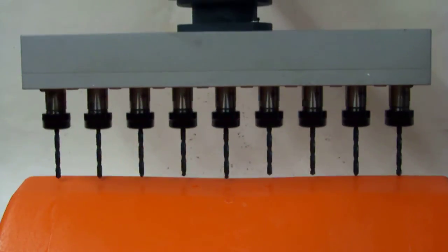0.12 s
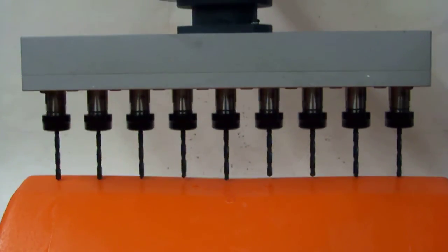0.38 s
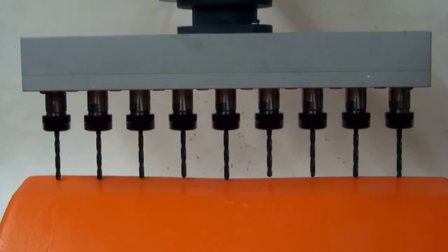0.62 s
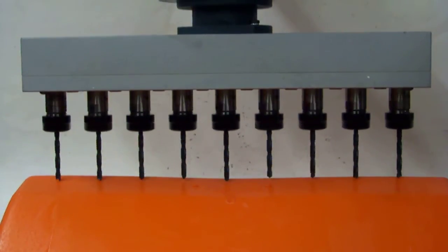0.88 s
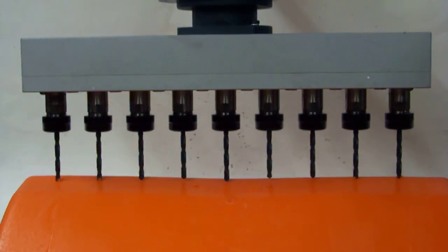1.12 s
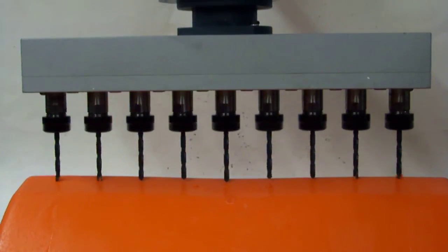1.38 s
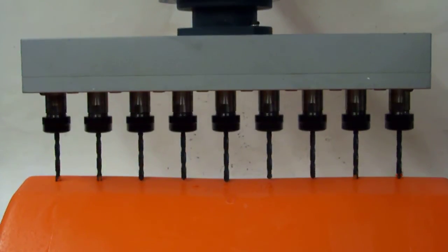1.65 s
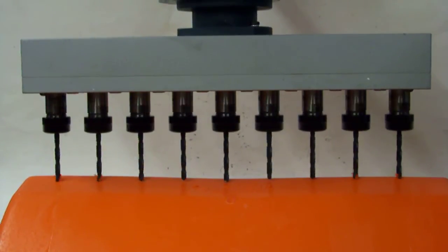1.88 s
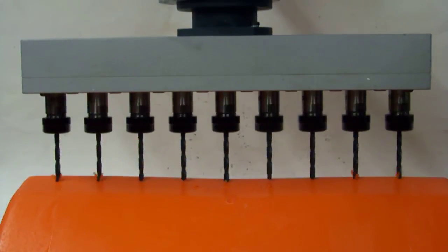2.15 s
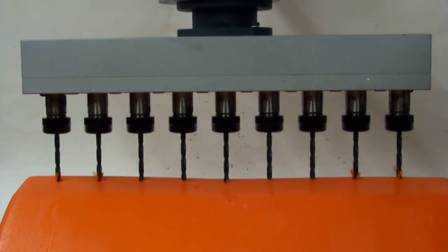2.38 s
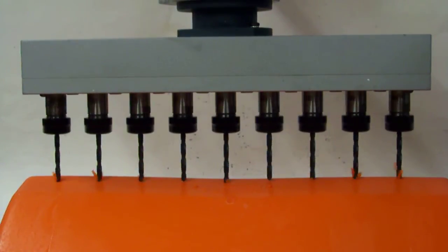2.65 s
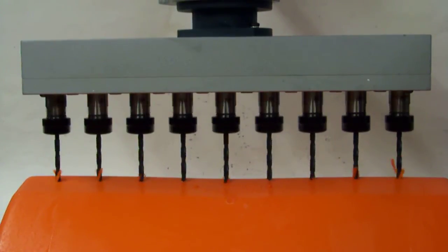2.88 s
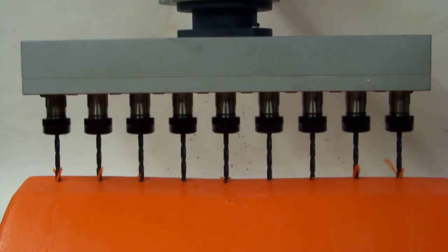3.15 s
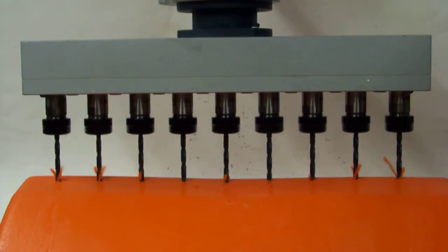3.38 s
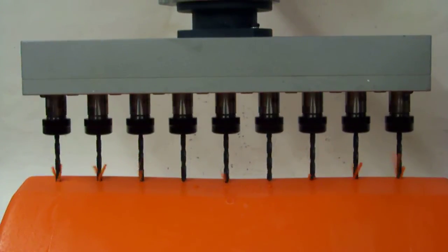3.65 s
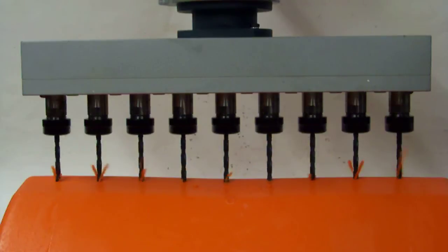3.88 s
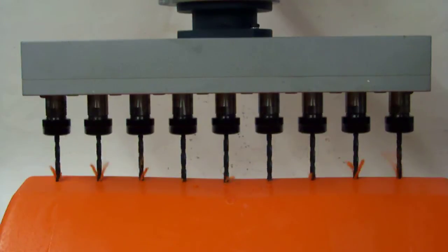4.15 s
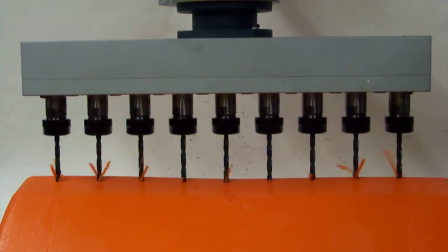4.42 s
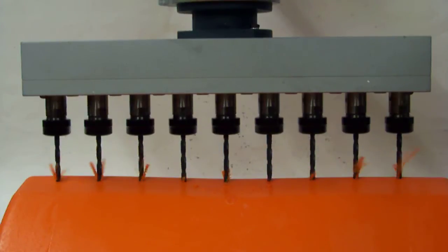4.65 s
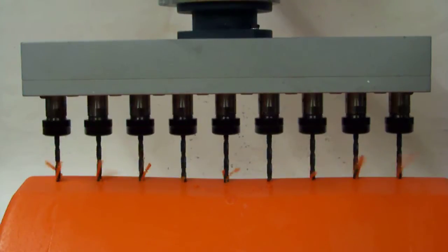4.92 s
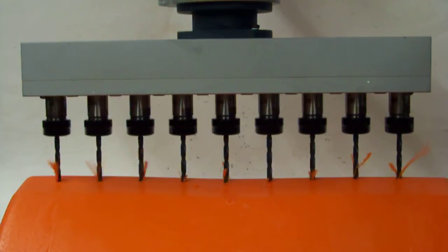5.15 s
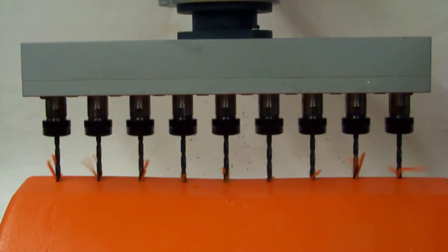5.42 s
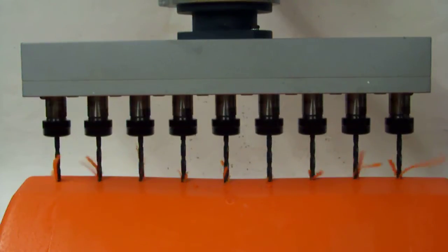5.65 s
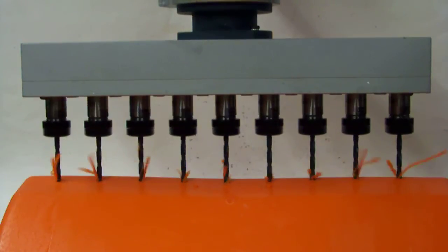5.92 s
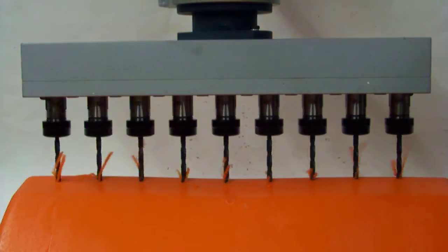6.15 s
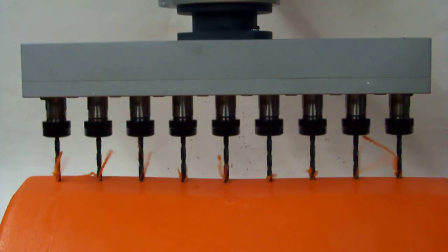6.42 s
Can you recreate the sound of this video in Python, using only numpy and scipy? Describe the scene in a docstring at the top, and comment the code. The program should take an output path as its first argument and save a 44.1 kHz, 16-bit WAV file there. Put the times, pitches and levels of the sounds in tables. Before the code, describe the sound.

Hollow plastic clatter at the start over a humming drilling machine, then a piercing, slightly stuttering gear whine grows as many bits scrape and crackle into plastic.

```python
"""A motor's hum and whirring gears come first, joined at once by hollow knocks as bits land on a plastic shell.
A nine-spindle drilling head is lowered in a workshop: as it bites, the gear whine and cutting noise swell.
Hum and gears are wavering sines, knocks are ringing modes, and scraping, chips and idling are shaped noise.
The recorder's clock lags and catches up in small skips thirty times a second, so every tone stutters in step."""
import sys
import numpy as np
from scipy import signal
from scipy.fft import rfft, irfft
from scipy.io import wavfile

SR = 44100
rng = np.random.default_rng(int(sys.argv[2]) if len(sys.argv) > 2 else 0)


def voltage_ratio(decibels):
    """Convert decibels (scalar or array-like) to amplitude ratios, 20 dB per decade."""
    exponent = np.asarray(decibels, float) / 20
    return 10 ** exponent


def file_out(sig):
    """Save sig as 16-bit WAV at sys.argv[1]."""
    # one column per channel
    cols = np.atleast_2d(sig).T
    # limit, then scale
    lim = np.clip(cols, -1, 1)
    pcm = np.round(lim * 32767).astype(np.int16)
    wavfile.write(sys.argv[1], SR, pcm)


N = 288414   # length in samples
F = np.fft.rfftfreq(N, 1 / SR) + 1   # Hz; the added 1 avoids the log of zero
LEFT_LAG_RAD = .16   # the left side lags the right by this phase
BITE_S = .7   # the bits start to bite
SKIPS_PER_S, FIRST_SKIP_S = 30, .0355


def at_hz(points):
    """Joins a table of (Hz, value) on a log-frequency axis."""
    hz, value = np.array(points).T
    return np.interp(np.log(F), np.log(hz), value)


def bumps_db(rows):
    """Sum of bell-shaped peaks or dips in dB."""
    return sum(db / (1 + (2 * (F - hz) / width) ** 2) for hz, width, db in rows)


def drift(rate_hz):
    """Random wandering of spread 1: noise smoothed twice, with its corner at rate_hz."""
    r = np.exp(-80 * np.pi * rate_hz / SR)   # made at one value per 40 samples
    wander = signal.lfilter([1], [1, -2 * r, r * r], rng.standard_normal(N // 40 + 2002))
    wander = wander[2000:]   # skip the filter's start-up
    return np.interp(np.arange(N) / 40, np.arange(len(wander)), wander / wander.std())


def growth_db(delay_s, growth_s, idle_db, full_db):
    """A level that rests until its delay after the bite, then closes in on its full value."""
    since = np.maximum(np.arange(N) / SR - BITE_S - delay_s, 0)
    return full_db + (idle_db - full_db) * np.exp(-since / growth_s)


def pan(left_right_db):
    """Left and right gains whose mean is 1."""
    right = voltage_ratio(-left_right_db)
    gains = np.array([np.ones_like(right), right]).reshape(2, -1)
    return 2 * gains / (1 + right)


# How alike the two sides of the noise are. Each row: frequency in Hz, likeness from 0 to 1.
LIKENESS = [(60, 1), (600, 1), (900, 0.82), (1300, .7), (2000, 0.92), (2700, 0.15), (4000, 0.24),
            (8000, 0.16)]
# How much louder the noise is on the left. Each row: frequency in Hz, left over right in dB.
LEFT_OVER_RIGHT = [(60, 7.5), (100, 13), (180, 11), (310, 11.5), (530, 6.5), (910, 7.5), (1580, 11),
                   (2720, 13), (4690, 5), (8090, 0.5)]


def stereo_noise(gain):
    """Noise of a given spectrum; the right side shares only part of it. The mid has rms 1."""
    shared, own = rfft(rng.standard_normal((2, N)))
    alike = np.clip(at_hz(LIKENESS), 0, 1)
    right = alike * shared + np.sqrt(1 - alike ** 2) * own
    right = right * np.exp(1j * LEFT_LAG_RAD)
    out = irfft(gain * pan(at_hz(LEFT_OVER_RIGHT)) * [shared, right], N)
    return out / out.mean(axis=0).std()


def skip_times():
    """Start of each regular clock skip, in seconds."""
    return np.arange(FIRST_SKIP_S, N / SR, 1 / SKIPS_PER_S)


# The largest clock skips, heard as hiccups of the whine. Each row: time in seconds, size in samples.
LARGE_SKIPS = [(.109, 5), (.199, 5), (.242, 4.5), (.438, 4.5), (.576, 5.5), (.804, 6.5), (1.203, 5.5),
               (1.3067, 7), (2.371, 4), (3.302, 7.9), (3.468, 4.5), (3.904, 4.5), (4.3, 12), (4.8015, 8),
               (5.302, 8.5), (6.133, 4.5)]


def recorder_clock():
    """Seconds as the recorder keeps them: a steady lag made up by regular skips of random size."""
    times, t = skip_times(), np.arange(N) / SR
    skips = np.zeros(N)
    # average size 1.6 samples before the largest draws are capped
    skips[(times * SR).astype(int)] = 1.6 * rng.exponential(1, len(times)).clip(0, 2.2)
    for s, samples in LARGE_SKIPS:
        at = round(s * SR)
        skips[at - 400:at + 400] = 0   # a large skip replaces its close neighbours
        skips[at] = samples
    blend = np.hanning(int(.0065 * SR))   # each skip is spread over 6.5 ms
    gained = np.cumsum(signal.fftconvolve(skips, blend / blend.sum(), "same"))
    return t + (gained - gained[-1] * t / t[-1]) / SR


def tone(hz, db, pan_db, clock, waver_db, rate_hz):
    """A sine of given rms level whose strength wavers."""
    turn = 2 * np.pi * (hz * clock + rng.random()) + np.array([[0], [LEFT_LAG_RAD]])
    strength = np.sqrt(2) * voltage_ratio(db + waver_db * drift(rate_hz))
    return strength * pan(pan_db) * np.sin(turn)


# How the whine swells: delay after the bite and growth time in seconds, idle and full level in dB.
WHINE_GROWTH = (0, 1.54, -28, -21)
# How the other gear tones swell: delay after the bite and growth time in seconds, idle and full level in dB.
GEAR_GROWTH = (-.4, .15, -32.5, -30.8)
# Gear mesh, its side tones from spindle turn and hum, and faint upper meshes. Each entry: pitch in Hz.
GEAR_HZ = [636.6, 656.7, 677, 700.5, 756.4, 776.6, 1433.3, 1866.7, 2277, 2451, 2491, 2560, 2746.8, 3009,
           3162.7, 3523]
# Loudness of those pitches, in the same order. Each row: dB relative to the gear level, left over right in dB.
GEAR_LOUDNESS = [(-19.5, 6), (-1, 9.5), (-23, 11.5), (-19, 4), (-21.5, 5), (-15, 10.5), (-18.5, 14),
                 (-21, 7.5), (-31, 8), (-29.5, 8.5), (-30, 9.5), (-31, 7), (-20, 4.5), (-28, 10.5),
                 (-28, 9.5), (-30, 6.5)]
# Neighbours of the whine on the fast shaft. Each row: multiple of the shaft speed, rms in dB,
# left over right in dB.
SHAFT_TONES = [(13, -55.5, 9), (15, -47, 9.2), (16, -40.5, 10.5), (18, -51, 7), (19, -60, 9.3)]
# Slower shafts, slightly off centre, make the whine throb. Each row: turns per second, swing in dB.
RUNOUT = [(11.2, 0.4), (20.2, 0.32), (23.9, 0.67)]


def gears():
    """Meshing teeth sing at pitches tied to one shaft angle, which slows a little as the load grows."""
    shaft_hz, teeth = 107.45, 17
    sag = .0006   # share of speed lost between idle and full load
    clock = recorder_clock_now
    whine_db, gear_db = growth_db(*WHINE_GROWTH), growth_db(*GEAR_GROWTH)
    load = np.interp(whine_db, [whine_db.min(), whine_db.max()], [0, 1])
    angle = clock - np.cumsum(sag * (load - load.mean())) / SR

    # weaker mesh tones waver more
    mesh = sum(tone(hz, gear_db + db, pan_db, angle, waver_db=0.5 - 0.1 * db, rate_hz=10.0)
               for hz, (db, pan_db) in zip(GEAR_HZ, GEAR_LOUDNESS))
    neighbours = sum(tone(k * shaft_hz, db, pan_db, angle, waver_db=1.5, rate_hz=9.1)
                     for k, db, pan_db in SHAFT_TONES)
    throb_db = sum(db * np.sin(2 * np.pi * (turns * angle + rng.random())) for turns, db in RUNOUT)
    whine = tone(teeth * shaft_hz, whine_db + throb_db, 10.0, angle, waver_db=0.05, rate_hz=17.0)
    return mesh + neighbours + whine


# How the hum swells: delay after the bite and growth time in seconds (it starts early), idle and full level in dB.
HUM_GROWTH = (-.35, .55, -36, -31.6)
# Magnetic hum. Each row: multiple of twice the mains, dB relative to the hum level, left over right in dB.
HUM = [(1, -23.5, 28), (2, -20, 8.9), (3, -0.5, 11.7), (4, -22, 10), (6, -11, 6.7), (7, -25.5, 12)]


def motor():
    """Magnetic hum locked to the mains, at multiples of twice its frequency."""
    mains_twice_hz = 120.12
    hum_db = growth_db(*HUM_GROWTH)
    return sum(tone(k * mains_twice_hz, hum_db + db, pan_db, recorder_clock_now, waver_db=0.68, rate_hz=14.0)
               for k, db, pan_db in HUM)


# Bits landing on the shell and chattering. Each row: time in seconds, level in dB, brightness in dB per octave.
KNOCKS = [(0.1297, -12.5, 3), (.1387, -14.5, .5), (0.155, -15, -5), (.166, -19.5, 0), (0.1751, -20, 2.5),
          (0.1895, -18.5, -6), (.203, -27, 1), (.222, -27, 1), (.24, -27, -0.7), (.256, -26, -4.5),
          (.283, -26.5, -6), (0.575, -26.5, -8)]
# Ringing modes of the shell. Each row: pitch in Hz, level in dB, seconds to fade by 60 dB.
SHELL_MODES = [(165, -23.5, 0.28), (212.6, -12, 0.24), (244, -7, 0.21), (343, -16, 0.061), (423, -9, 0.077),
               (467, -5.5, 0.049), (537.5, -5.5, .1), (628, -5, 0.07), (706, -5.5, 0.097), (795, -8, 0.06),
               (850, -10, .09), (924, -19, 0.035), (1078, -16.5, 0.07), (1290, -16.5, .04),
               (1630, -19.5, .03), (2700, -25, .02), (3100, -25, .02), (3900, -26, .02), (4500, -28, .015)]


def shell():
    """Each knock pushes the shell's modes with strengths of its own; harder contacts favour the high ones."""
    contact_s = .0005   # the plastic gives before it pushes back
    out, age = np.zeros(N), np.arange(int(.5 * SR)) / SR
    chance_db = rng.normal(0, 1.5, (len(KNOCKS), len(SHELL_MODES)))
    for (s, db, tilt_db), own_db in zip(KNOCKS, chance_db):
        rings = 0
        for (hz, mode_db, t60), extra_db in zip(SHELL_MODES, own_db):
            level_db = mode_db + extra_db + tilt_db * np.log2(hz / 400) - 60 * age / t60
            rings = rings + voltage_ratio(level_db) * np.sin(2 * np.pi * hz * age)
        out[round(s * SR):][:len(age)] -= voltage_ratio(db) * rings * (1 - np.exp(-age / contact_s))
    # a light shell radiates no deep bass
    out = signal.sosfilt(signal.butter(4, 165, "high", fs=SR, output="sos"), out)
    return out * pan(10.5)


# How the scraping swells once the flutes are in: delay after the bite and growth time in seconds,
# idle and full level in dB.
SCRAPING_GROWTH = (1.0, 1.0, -44.5, -35.3)
# Resonances of the shell under the bits. Each row: centre in Hz, width in Hz, height in dB.
CUTTING_PEAKS = [(1039, 280, -3), (1144, 55, -1.5), (1223.6, 35, 5), (1480, 420, -5.5), (765, 260, -9.5)]
# Cancellations by bench reflections, also used by running(). Each row: centre in Hz, width in Hz, depth in dB.
NULLS = [(296.7, 52, -17.5), (597, 50, -7), (966, 20, -17)]


def cutting():
    """The flutes scrape noise into the shell's resonances."""
    power = sum(voltage_ratio(2 * db) / (1 + (2 * (F - hz) / width) ** 2) ** 2 for hz, width, db in CUTTING_PEAKS)
    colour = np.sqrt(power) * voltage_ratio(bumps_db(NULLS))
    return voltage_ratio(growth_db(*SCRAPING_GROWTH) + 1.8 * drift(8.2)) * stereo_noise(colour)


# How the chip noise swells, also used by crackle(): delay after the bite and growth time in seconds,
# idle and full level in dB.
CHIPS_GROWTH = (0, 0.4, -49.5, -42)
# Chucks and bits ring in the hiss. Each row: centre in Hz, width in Hz, height in dB.
CHUCKS = [(2820, 90, 1), (3150, 130, 5), (3660, 170, 1), (4200, 170, 3)]


def chips():
    """Gritty treble from small chips: noise whose strength jumps at random."""
    treble = [(1900, -30.5), (2500, -5), (3700, 2.5), (4500, -3.5), (5200, -9.5), (7000, -8.5), (8400, -34.5)]
    colour = voltage_ratio(at_hz(treble) + bumps_db(CHUCKS))
    grit = voltage_ratio(0.99 * drift(150.0) + 0.97 * drift(11.0))
    return voltage_ratio(growth_db(*CHIPS_GROWTH)) * grit * stereo_noise(colour)


def crackle():
    """Chips snap off at random and ring briefly at pitches across the low treble."""
    per_s, cycles = 700.0, 31.0   # snaps per second; cycles to fade by 60 dB
    sizes = voltage_ratio(5.1 * np.minimum(rng.exponential(1, N), 3.3)) * (rng.random(N) < per_s / SR)
    dealt, out = rng.integers(0, 12, N), 0   # each snap is dealt one of 12 pitches
    for k, hz in enumerate(np.geomspace(2600, 6200, num=12)):
        r, w = voltage_ratio(-60 * hz / cycles / SR), 2 * np.pi * hz / SR
        pushes = sizes * (dealt == k) + 1e-18   # the tiny offset keeps the filter from slowing down
        rings = signal.lfilter([0, np.sin(w)], [1, -2 * r * np.cos(w), r * r], pushes)
        out = out + rings * voltage_ratio(-7.0 * np.log2(hz / 2600)) * pan(7.0 + rng.normal(0, 3))
    return voltage_ratio(growth_db(*CHIPS_GROWTH) - 6.5) * out / out.mean(axis=0).std()


# Sharp clicks at clock skips. Each row: time in seconds, level in dB before the top is dulled.
CLICKS = [(.8, -27.5), (1.306, -25.5), (1.803, -27), (2.6673, -22), (2.935, -22.5), (2.9687, -18),
          (3.0683, -22), (4.802, -15.5), (5.238, -26), (5.8694, -29), (6.4946, -26)]
# Larger chips snap off. Each row: time in seconds, level in dB before the top is dulled, pitch in Hz.
SNAPS = [(0.0733, -30, 5000), (1.119, -26, 4020), (1.2267, -27, 4430), (1.372, -27, 3230),
         (1.6173, -27, 4570), (1.931, -26, 3670), (2.4979, -23.5, 4400), (3.3488, -23, 3300)]


def ticks():
    """Each click or snap is a damped burst; the microphones dull its top."""
    click_hz, click_ms, snap_ms = 5600, .15, 1.6   # fade times are to 1/e
    out, age = np.zeros(N + 900), np.arange(900) / SR
    times = skip_times()
    # every regular skip clicks faintly, with a spread in dB
    faint = zip(times, -38 + 4.5 * rng.standard_normal(len(times)).clip(-2, 2))
    bursts = [(s, db, click_hz, click_ms) for s, db in [*CLICKS, *faint]]
    bursts += [(s, db, hz, snap_ms) for s, db, hz in SNAPS]
    for s, db, hz, decay_ms in bursts:
        burst = np.exp(-1e3 * age / decay_ms) * np.cos(2 * np.pi * hz * age)
        out[round(s * SR):][:len(age)] += voltage_ratio(db) * burst
    return signal.sosfilt(signal.butter(3, 7800, fs=SR, output="sos"), out[:N]) * pan(5.5)


# Colour of the steady machine noise, falling steeply above 7 kHz. Each row: frequency in Hz, relative density
# in dB per Hz.
RUNNING = [(20, -0.5), (40, -2.5), (70, -3), (130, -5), (200, -4), (400, 1), (750, 0), (1050, -4),
           (1900, 1), (2150, -5), (4200, -11.5), (5000, -17), (7100, -18), (7900, -32), (8400, -45)]
# Resonances of the running machine. Each row: centre in Hz, width in Hz, height in dB.
HOUSING = [(81, 20, 9), (124, 18, 2.5), (158.6, 18, 9.5), (234, 62, 7.5), (1001, 30, 3), (1845, 30, 14)]


def running():
    """Broad steady noise of the running machine, coloured by its resonances."""
    colour = voltage_ratio(at_hz(RUNNING) + bumps_db(HOUSING + NULLS))
    return voltage_ratio(-33.5) * stereo_noise(colour)


recorder_clock_now = recorder_clock()   # one clock in seconds, shared by all tones


def scene():
    """Machine, cut and knocks at the two microphones."""
    machine = gears() + motor() + running()
    cut = cutting() + chips() + crackle()
    return machine + cut + shell() + ticks()


def roll_off(x):
    """The treble ends steeply here."""
    return signal.sosfilt(signal.butter(12, 8690, fs=SR, output="sos"), x)


def record(dry):
    """A steep anti-alias edge removes the top treble."""
    dull = signal.sosfilt(signal.cheby2(10, 40, 9500, fs=SR, output="sos"), dry)
    return roll_off(dull)


dry = scene()
out = record(dry)
file_out(out)
```